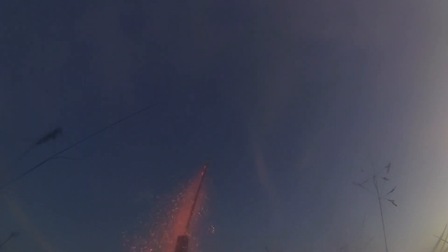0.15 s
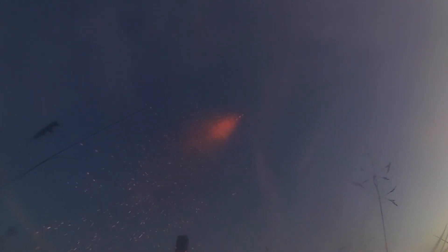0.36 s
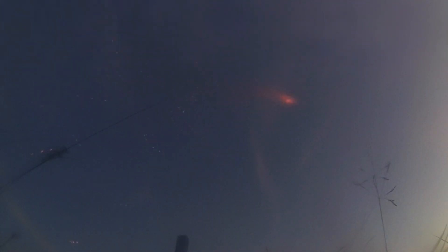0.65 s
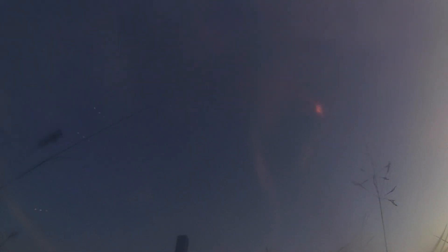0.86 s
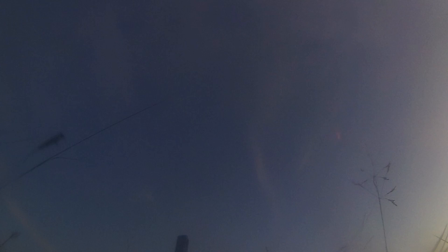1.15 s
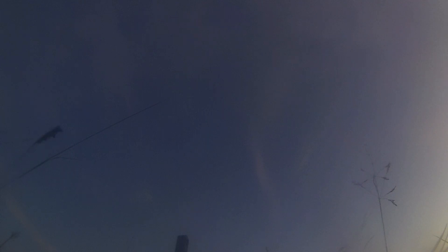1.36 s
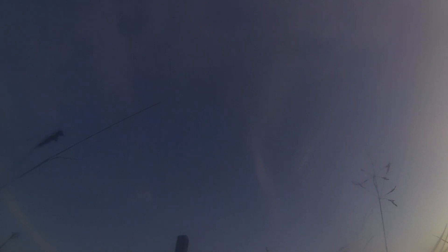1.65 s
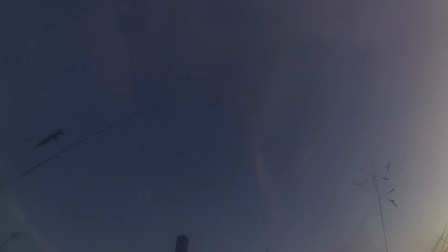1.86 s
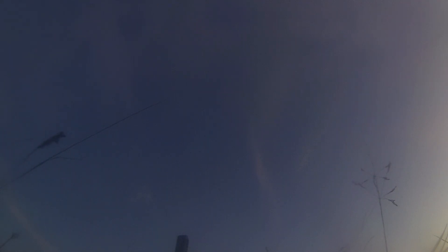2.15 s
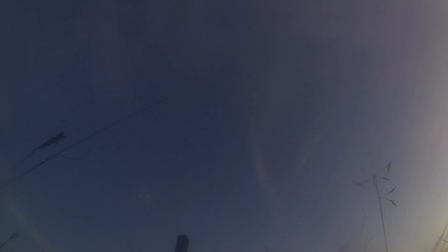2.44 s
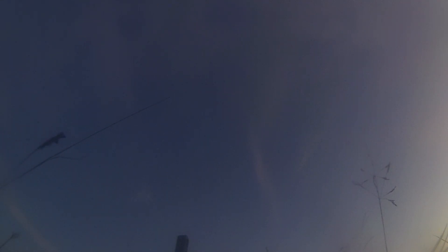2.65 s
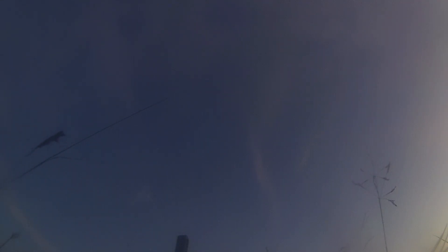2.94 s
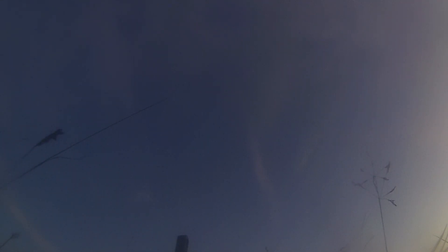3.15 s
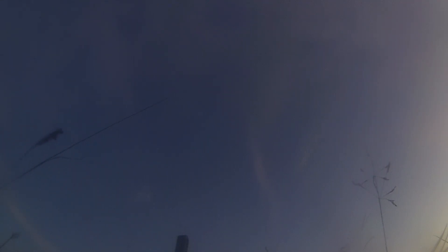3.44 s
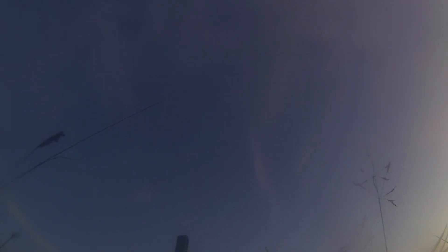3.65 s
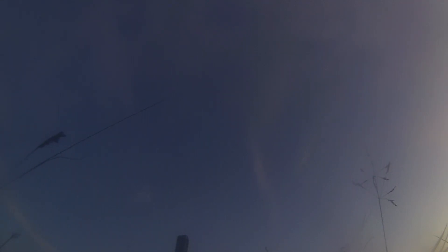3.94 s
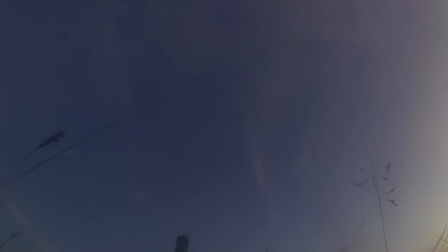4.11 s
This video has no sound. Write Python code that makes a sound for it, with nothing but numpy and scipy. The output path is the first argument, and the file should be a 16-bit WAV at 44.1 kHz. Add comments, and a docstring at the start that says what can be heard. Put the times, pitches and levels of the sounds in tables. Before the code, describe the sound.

A small firework rocket bursts off with a loud crackling hiss that thins away into the distance, followed by soft wind thumps.

```python
"""A rush of hiss bursts out and thins away as a small firework rocket arcs over open ground, with low thumps.
The jet is crackling noise; its ground echo adds a comb whose notches slide down in the climb, up in the sinking.
Lumpy low noise and single pulses are the launch blast up to about 0.75 s and light wind after it,
heard at a camera with two microphone ports. Hiss, two thin whine lines and short, faint low tones lie behind."""
import sys
import numpy as np
from scipy import signal
from scipy.io import wavfile
from scipy.ndimage import uniform_filter1d

SR = 44100
rng = np.random.default_rng(int(sys.argv[2]) if len(sys.argv) > 2 else 0)


def digitize_waveform(pressure):
    """Quantize a signal to 16-bit integers and store it at the path in sys.argv[1].

    Rows of a 2-D input are taken as channels; values are limited to [-1, 1].
    """
    field = np.atleast_2d(pressure).T
    bounded = np.clip(field, -1, 1)
    quanta = np.round(bounded * 32767).astype(np.int16)
    wavfile.write(sys.argv[1], SR, quanta)


N = 188643
SIZE, HOP = 1024, 128  # spectral frame and step, samples
HZ = np.fft.rfftfreq(SIZE, 1 / SR)
TIMES = np.arange(N // HOP + 9) * HOP / SR

# Jet: level of the hiss near 9 kHz. Each row: time in seconds, relative level in dB.
HISS = [(0.0, -30), (0.19, -23.5), (0.27, -23), (0.39, -21.5), (0.48, -24.5), (0.55, -21.5), (0.61, -17.5),
        (0.67, -22.5), (0.75, -24), (0.8, -27), (0.83, -32), (0.95, -31.5), (1.06, -34), (1.19, -43),
        (1.27, -38.5), (1.43, -34), (1.62, -40), (1.8, -42), (2.0, -43), (2.1, -47), (2.24, -47),
        (2.38, -42.5), (2.465, -51.5), (2.495, -55), (2.8, -55), (3.11, -58), (3.17, -50), (3.24, -60),
        (3.38, -56.5), (3.56, -61), (3.92, -62.5), (4.0, -57), (4.13, -65), (4.22, -53.5), (4.28, -58)]
# Lower bands of the jet. Each row: time in seconds, relative level near 1.5 kHz in dB, near 4 kHz in dB.
ROAR = [(0.0, -24, -32), (0.22, -18.5, -26.5), (0.3, -22, -26.5), (0.52, -27.5, -24.5),
        (0.62, -23.5, -25.5), (0.74, -30.5, -24.5), (0.8, -33, -31.5), (0.88, -34, -39), (0.95, -39, -39),
        (1.04, -44, -42.5), (1.25, -49, -43.5), (1.47, -46, -43), (1.6, -49.5, -42.5), (2.0, -54.5, -50),
        (2.3, -57, -52.5), (2.47, -55, -50), (2.495, -59, -55.5), (2.75, -57, -54), (3.1, -62.5, -61.5),
        (3.3, -59, -55.5), (3.47, -55, -51), (3.58, -57, -60.5), (3.7, -65.5, -58), (3.95, -56.5, -56),
        (4.04, -56.5, -54), (4.1, -62.5, -52), (4.18, -54, -49), (4.28, -59, -55)]
# Jet rumble under 700 Hz. Each row: time in seconds, relative level in dB.
RUMBLE = [(0.0, -42), (0.12, -38.5), (0.36, -32), (0.4, -32), (0.44, -39.5), (0.49, -32), (0.62, -36.5),
          (0.77, -41.5), (0.9, -41), (1.1, -47), (1.9, -56.5), (2.4, -59), (3.6, -65), (4.28, -78)]
# Plain colour of the jet at the ports. Each row: frequency in Hz, relative density in dB per Hz.
JET_COLOUR = [(90, -20), (200, -14), (330, -15.5), (450, -13.5), (650, -9), (850, -9.5), (1050, -5.5),
              (1250, -8), (1800, -9), (1960, -9), (2300, -13), (2700, -14.5), (3900, -10.5), (5200, -14.5),
              (8000, -5), (10300, -2), (12300, -14.5), (15900, -24.5)]
# How far each band control reaches. Each row: frequency in Hz, share of the control.
ROAR_REACH = [(700, 0.13), (950, 0.82), (1150, 1), (1950, 0.66), (2250, 0.41), (3000, 0.01)]
MIDDLE_REACH = [(1800, 0.29), (3000, 1), (4500, 0.66), (7000, 0.01)]
RUMBLE_REACH = [(100, 0.55), (700, 0.81), (1100, 0.025)]
# Each band over the hiss when the jet has its plain colour, dB
USUAL_ROAR_DB, USUAL_MIDDLE_DB, USUAL_RUMBLE_DB = -4, -8.5, -8.5
# Resonances of the camera's shell. Each row: frequency in Hz, width in Hz, boost in dB.
SHELL = [(1320, 125, 6.), (1730, 160, 6.)]
# The roar's lower edge and the top treble rise and fall. Each row: time in seconds,
# level of the lower edge in dB, level of the top treble in dB.
EDGES = [(0, -4, -1), (.1, -5.5, -1), (.3, -5.5, 0), (.55, -4, 1.5), (.7, -1, 1.5), (.85, 0.5, 1),
         (1.0, 2, 2), (1.3, 2, 0), (2.3, 1.5, -1), (3, -.5, 0), (3.45, -2, 0), (4.28, -1, -1)]
# Reach of each of the two. Each row: frequency in Hz, share of the level in dB.
LOWER_EDGE_REACH = [(790, 0), (920, 1), (1120, 1), (1250, 0)]
TOP_REACH = [(11000, 0), (12500, 1)]

# The powder flares up, or now and then dips. Each row: time in seconds,
# rise in dB before levelling off, length in ms.
FLARES = [(.134, 1.5, 24), (.194, 1.5, 36), (0.311, 1.5, 13), (0.347, 1, 36), (.382, 1, 8), (0.441, 4, 11),
          (.496, 2.5, 11), (.597, 2, 40), (0.751, 0.5, 6.9), (.826, -3.5, 13), (0.889, 8.5, 11),
          (1.018, 1, 6.4), (1.082, 5, 11), (1.137, 2.5, 6.8), (1.181, 5, 10), (1.363, 10, 11),
          (1.435, 5, 13), (1.586, 0, 11), (1.629, 9, 16), (1.765, 9, 12), (1.854, 5, 13), (1.892, 2.5, 38),
          (1.992, 9, 16), (2.025, 5.5, 6.1), (2.061, 7, 7.5), (2.165, 5, 19), (2.216, 8, 18), (2.27, 1, 15),
          (2.32, 0.5, 44), (2.425, 13, 17), (2.476, 8, 15), (3.466, 4, 18), (3.522, 1.5, 15),
          (3.635, 4, 7.8), (4.035, 2.5, 21)]
# Flares lift the jet below this; the hiss above follows by this share
FLARE_TOP_HZ, FLARE_HISS_SHARE = 5300, 0.16
FLARE_MOST_DB = 4.  # flares level off toward this rise
SPARKS_PER_S, SPARKS_DB, SPARK_SPREAD_DB = 700, -11, 3.2  # popping sparks; level against the steady noise

# Extra path by way of the ground, longest with the rocket highest. Each row: time in seconds, lag in ms.
GROUND_LAG = [(0.0, 0.32), (0.19, 0.45), (0.33, 0.55), (0.47, 0.77), (0.61, 1.09), (0.75, 1.44),
              (0.89, 1.76), (1.03, 2.02), (1.2, 2.27), (1.5, 2.57), (1.8, 2.5), (2.4, 2.27), (2.7, 2.1),
              (3.3, 1.74), (3.9, 1.36), (4.28, 1.12)]
# Soft ground returns less treble. Each row: frequency in Hz, reflection factor before further factors.
GROUND = [(300, .75), (700, .78), (1500, .8), (2300, .78), (3200, .68), (6000, .68), (7500, .3),
          (10000, .09)]
# Extra phase turn of the echo. Each row: frequency in Hz, delay in radians.
GROUND_TURN = [(300, 0.79), (800, 0.52), (1300, 0.22), (1750, 0.034), (2300, 0.48), (3000, 0.28),
               (4000, -0.16), (5000, -0.95)]
STEEP_LOSS_DB = 1.9  # weaker reflection per ms of lag, as the sound strikes the ground more steeply
# Echo strength over time, weak near launch, swelling and fading later. Each row: time in seconds,
# echo factor in the middle band, echo factor in the high band.
ECHO_STRENGTH = [(0.3, .3, .3), (.45, .5, .75), (.65, .5, .8), (.85, .45, .6), (1.0, .55, .45),
                 (2.0, .6, .55), (2.7, .8, .75), (3.1, .55, .45), (3.47, 1.1, .9), (3.72, .55, .5),
                 (3.95, 1.1, .85), (4.2, 1.3, .7)]
ECHO_MIDDLE_HZ, ECHO_HIGH_HZ = 900, 2400  # where the middle and high bands begin

# The rocket swings off the camera's axis. Each row: time in seconds, bearing factor, left over right in dB.
BEARING = [(0, 0.21, 0.3), (.95, 0.69, -1), (1.4, 0.85, -1.2), (2.0, 1, -0.5), (2.8, 0.99, -1),
           (3.5, 0.58, -2.2), (4.28, 1.27, -4)]
# Phase between the ports at bearing 1. Each row: frequency in Hz, left lead in radians.
PORT_PHASE = [(200, -0.4), (500, 1.1), (1000, 0), (1400, -0.23), (2000, 0.7), (4000, 0.8), (6000, 0.1),
              (8000, 2.27), (10000, 2), (12500, 0.8), (15000, 2.7)]
# Likeness of the ports at bearing 1. Each row: frequency in Hz, likeness from 0 to 1.
PORT_SAME = [(200, 0.9), (700, 0.88), (1150, 0.97), (1800, 0.975), (2500, 0.7), (4000, 0.85), (6000, 0.8),
             (8000, 0.65), (10000, 0.7), (13000, 0.62)]
# Port balance by pitch. Each row: frequency in Hz, left over right in dB.
PORT_BALANCE = [(200, 0.5), (700, -1.5), (1500, -0.8), (2500, -1), (4000, -1), (8300, -4.5), (9800, 7.5),
                (12000, 4.5), (15000, -2.5)]

# Low rumble of the launch blast up to about 0.75 s, of wind after it.
# Each row: time in seconds, relative level in dB.
LOW_RUMBLE = [(0.0, -53), (0.2, -72), (0.33, -64), (0.52, -47), (0.64, -61), (0.72, -58), (0.77, -62),
              (0.98, -46), (1.14, -52), (1.2, -54), (1.4, -51.5), (1.65, -58), (1.9, -52), (2.02, -57),
              (2.9, -54), (3.25, -55), (3.55, -59.5), (3.75, -55), (3.9, -46.5), (4.28, -52)]
# Colour of that low rumble. Each row: frequency in Hz, relative density in dB per Hz.
LOW_RUMBLE_COLOUR = [(7.1, -18), (12, -2), (32, -11.5), (68, -10.5), (184, -30), (236, -25.5), (281, -30.5),
                     (400, -29.5), (520, -37), (880, -120)]
# Single thumps, of the launch blast up to about 0.75 s, of wind after it. Each row: time in seconds,
# nominal peak in dB, pitch in Hz, left port ahead in ms, push 1 or pull -1.
THUMPS = [(0.209, -53, 190, .1, 1), (0.306, -32, 100, 0.0089, 1), (0.361, -32, 132, -0.19, -1),
          (0.376, -46, 135, 0.22, 1), (0.389, -39, 60, .1, -1), (0.556, -32, 97, .1, -1),
          (0.611, -44, 60.4, .1, -1), (0.628, -34, 146, -0.048, 1), (0.647, -27, 163, 0.022, -1),
          (0.69, -32.5, 140, -0.039, 1), (1.066, -21.5, 101, 0.91, 1), (1.095, -33, 58, 0.6, -1),
          (1.124, -39, 70, 0.65, -1), (1.344, -31, 120, -0.93, 1), (1.422, -40.5, 110, -0.89, -1),
          (1.482, -32, 62.6, -0.7, -1), (1.511, -29, 106, -0.67, -1), (1.542, -30, 154, -0.79, -1),
          (1.561, -28.5, 67, -1.2, 1), (1.77, -35, 51.4, 0.39, -1), (1.869, -37, 75, 0.95, -1),
          (2.214, -35, 67, 0.49, -1), (2.254, -34, 38.7, 0.3, 1), (2.267, -30, 67, 0.93, -1),
          (2.605, -33.5, 56, 0.4, -1), (2.62, -34, 57, 0.55, -1), (2.643, -36.5, 58.7, 0.79, -1),
          (2.787, -41, 50, .3, -1), (3.809, -43.5, 45, .3, -1), (3.954, -32, 54.7, 0.57, -1),
          (4.011, -36, 46.3, 0.1, 1), (4.115, -35.5, 54.7, -0.54, -1), (4.166, -35, 75, -0.61, -1),
          (4.197, -35, 60, -0.3, -1), (4.234, -36, 45, 0.18, -1), (4.252, -36, 49.7, 0.23, 1)]
SWELL_S, SWELL_DB = 0.022, -21  # low rumble swells at each thump: half-width, control level against the peak
FLUTTER_SLOPE, FLUTTER_AT_DB = 0.81, -62  # dB of flutter held back per dB of low rumble, and the pivot level
LAUNCH_S, LAUNCH_FLUTTER_DB = 0.83, 3  # stronger flutter control up to this time
SHARP_HZ, SHARP_DB_PER_OCTAVE = 67.6, 4.5  # quicker thumps raise the flutter control

# Port hiss. Each row: frequency in Hz, relative density in dB per Hz.
AIR = [(100, -11), (300, -10), (800, -4), (2000, -10), (6000, -9.5), (12000, -9), (16000, -25)]
AIR_DB = -58  # rms, before the band limit
# Electrical whine. Each row: frequency in Hz, level in dB rms.
WHINE = [(13028, -84), (13108, -80)]
# Faint low tones far off. Each row: time of the middle in seconds, peak level in dB, pitch in Hz, length in seconds.
HOOTS = [(2.11, -55.5, 245.5, 0.083), (2.328, -53, 256, 0.034), (3.036, -54, 235, 0.12)]
HOOT_AHEAD = 0.87  # radians by which the far tones lead at the left port
EDGE_HZ = 15800


def gain_of(db):
    """Decibels to a factor."""
    return 10 ** (np.asarray(db) / 20)


def evened(x):
    """Scales to rms 1."""
    return x / np.sqrt(np.mean(x ** 2) + 1e-20)


def read(points):
    """A spectrum table on the frequency bins, as a column."""
    f, value = np.transpose(points)
    return np.interp(np.log(HZ + 1), np.log(f + 1), value)[:, None]


def follow(rows):
    """The columns of a curve table at the frame times."""
    s, *columns = np.transpose(rows)
    return [np.interp(TIMES, s, c) for c in columns]


def frames_of(x):
    """Short-time spectra."""
    return signal.stft(x, nperseg=SIZE, noverlap=SIZE - HOP)[2][..., :len(TIMES)]


def sound_of(z):
    """Back from short-time spectra."""
    return signal.istft(z, nperseg=SIZE, noverlap=SIZE - HOP)[1][..., :N]


def white(channels):
    """Spectra of white noise."""
    return frames_of(rng.standard_normal((channels, len(TIMES) * HOP)))


def wander(size):
    """Smooth chance at the sample rate, rms 1, its slowest drift taken out."""
    rough = rng.standard_normal(len(TIMES) * HOP)
    smooth = uniform_filter1d(uniform_filter1d(rough, size), size)
    return evened(smooth - uniform_filter1d(smooth, 4 * size))


def below(x, hz):
    """The part of a two-channel sound under a frequency, without delay."""
    return signal.oaconvolve(x, signal.firwin(255, hz, fs=SR)[None], "same")


def jet():
    """Burning noise takes its colour over time, meets its ground echo and spreads over the two ports."""
    level_db, treble = jet_colour()
    a, b = frames_of(sputter())
    bearing, pan_db = follow(BEARING)
    same = np.clip(1 - (1 - read(PORT_SAME)) * bearing, 0, 1)  # less alike off the axis
    right = same * a + np.sqrt(1 - same ** 2) * b
    right = right * np.exp(-1j * read(PORT_PHASE) * bearing)
    tilt = gain_of((read(PORT_BALANCE) + pan_db) / 2)
    ports = np.array([a * tilt, right / tilt])
    return sound_of(ports * ground_comb() * gain_of(level_db + 1.5) / treble)


def jet_colour(patchy_db=1.5):
    """The jet's moving spectrum in dB, with the treble strength of its plain colour for scaling."""
    hiss_db = follow(HISS)[0]
    roar_db, middle_db = follow(ROAR)
    rumble_db = follow(RUMBLE)[0]
    lower_edge_db, top_db = follow(EDGES)
    plain_db = read(JET_COLOUR)
    for hz, width, db in SHELL:
        plain_db = plain_db + db * np.exp(-((HZ[:, None] - hz) / width) ** 2)
    in_treble = (HZ > 6000) & (HZ < 12000)
    treble = np.sqrt(np.mean(gain_of(plain_db[in_treble]) ** 2) * 6000 / (SR / 2))
    # each lower band departs from the hiss only by its difference from the plain colour
    level_db = plain_db + hiss_db
    level_db = level_db + read(ROAR_REACH) * (roar_db - hiss_db - USUAL_ROAR_DB)
    level_db = level_db + read(MIDDLE_REACH) * (middle_db - hiss_db - USUAL_MIDDLE_DB)
    level_db = level_db + read(RUMBLE_REACH) * (rumble_db - hiss_db - USUAL_RUMBLE_DB)
    level_db = level_db + read(LOWER_EDGE_REACH) * lower_edge_db + read(TOP_REACH) * top_db
    # eddies in the air make bands swell and fade
    patches = rng.standard_normal((len(TIMES), len(HZ))).T
    patches = uniform_filter1d(uniform_filter1d(patches, size=12, axis=0), size=14, axis=1)
    return level_db + patchy_db * evened(patches), treble


def sputter(quick_db=0.53, hiss_db=0.7, roar_db=1.4, split_hz=2500):
    """Turbulent noise of burning powder: crackle, sparks and flares; roar and hiss surge each on their own."""
    crackle_db = quick_db * wander(size=60)
    t = np.arange(len(crackle_db)) / SR
    pop_sizes = gain_of(SPARK_SPREAD_DB * np.minimum(rng.exponential(1, len(t)), 4))
    pops = pop_sizes * (rng.random(len(t)) < SPARKS_PER_S / SR)
    puffs = signal.oaconvolve(pops, np.exp(-t[:200] / .0006))[:len(t)]  # 0.6 ms decay
    spark_power = (gain_of(SPARKS_DB) * evened(puffs)) ** 2
    noise = rng.standard_normal((2, len(t))) * np.sqrt(1 + spark_power)
    low = below(noise, split_hz)
    roar = low * gain_of(roar_db * wander(size=600))
    hiss = (noise - low) * gain_of(hiss_db * wander(size=500))
    plain = evened(gain_of(crackle_db) * (roar + hiss))
    flare_db = sum(db * np.exp(-(2000 * (t - s) / ms) ** 2) for s, db, ms in FLARES)
    flare_db = FLARE_MOST_DB * np.tanh(flare_db / FLARE_MOST_DB)
    body = below(plain, FLARE_TOP_HZ)
    return body * gain_of(flare_db) + (plain - body) * gain_of(FLARE_HISS_SHARE * flare_db)


def ground_comb():
    """Direct sound plus its late, duller ground echo: the two cancel at notches set by the lag."""
    lag_ms = follow(GROUND_LAG)[0]
    middle, high = follow(ECHO_STRENGTH)
    column = HZ[:, None]
    echo = read(GROUND) / gain_of(STEEP_LOSS_DB * lag_ms)
    echo = echo * np.select([column > ECHO_HIGH_HZ, column > ECHO_MIDDLE_HZ], [high, middle], 1)
    late = 2 * np.pi * column * lag_ms / 1000 + read(GROUND_TURN)  # radians
    return (1 + echo * np.exp(-1j * late)) / np.sqrt(1 + echo ** 2)


def thumps(turns=0.33, point=1.13, sag=0.13, sag_turns=1.32):
    """Blast, then wind: each sharply pushes or pulls the membranes in a slower counter-swing, port by port."""
    t, out = np.arange(N) / SR, np.zeros((2, N))
    skews = rng.uniform(-0.12, 0.52, len(THUMPS))  # radians
    for (s, db, hz, ahead_ms, way), skew in zip(THUMPS, skews):
        near = slice(max(round((s - .08) * SR), 0), round((s + .08) * SR))
        port_lead = np.array([[1], [-1]]) * ahead_ms / 2000
        u = (t[near] - s + port_lead) * hz  # cycles from the peak
        push = (1 + sag) * np.exp(-abs(u / turns) ** point) * np.cos(2 * np.pi * u + skew)
        push = push - sag * np.exp(-(u / sag_turns) ** 2)
        out[:, near] += np.sign(way) * gain_of(db) * push
    return out


def low_rumble(same=0.95):
    """Low lumpy pressure of the blast, then wind, nearly alike at both ports, swelling at each thump."""
    swells, sharp_db = 0, 0
    for s, db, hz, *_ in THUMPS:
        swell = np.exp(-((TIMES - s) / SWELL_S) ** 2)
        swells = swells + gain_of(db + SWELL_DB) * swell
        sharp_db = sharp_db + SHARP_DB_PER_OCTAVE * np.log2(hz / SHARP_HZ) * swell
    level_db = 20 * np.log10(gain_of(follow(LOW_RUMBLE)[0]) + swells)
    # the flutter, from about 140 Hz up, grows more slowly than the rumble
    flutter_db = FLUTTER_SLOPE * (FLUTTER_AT_DB - level_db) + LAUNCH_FLUTTER_DB * (TIMES < LAUNCH_S)
    flutter_db = flutter_db + sharp_db
    colour_db = read(LOW_RUMBLE_COLOUR) + read([(90, 0.1), (140, 0.97)]) * (flutter_db + 9.0)
    a, b = white(channels=2)
    ports = np.array([a, same * a + np.sqrt(1 - same ** 2) * b])
    steady = sound_of(ports * gain_of(colour_db))
    lumps_db = 1.1 * wander(size=1500)[:N]
    sample_db = np.interp(np.arange(N) / HOP, np.arange(len(TIMES)), level_db)
    return steady * gain_of(sample_db + 36.0 + lumps_db)


def background():
    """Unrelated hiss at each port, two thin electrical lines and the far tones."""
    t = np.arange(N) / SR
    hiss = gain_of(AIR_DB) * evened(sound_of(white(channels=2) * gain_of(read(AIR))))
    whine = sum(gain_of(db) * np.sqrt(2) * np.sin(2 * np.pi * hz * t) for hz, db in WHINE)
    hoots = np.zeros((2, N))
    for s, db, hz, length in HOOTS:
        tone = np.sin(2 * np.pi * hz * t + np.array([[HOOT_AHEAD], [0]]))
        hoots += gain_of(db) * np.exp(-(2 * (t - s) / length) ** 2) * tone
    return hiss + whine + hoots


def scene():
    """Rocket, low rumble, thumps and background."""
    return jet() + low_rumble() + thumps() + background()


def record(dry):
    """The recorder's band limit: a steep low-pass without delay."""
    low_pass = signal.firwin(1023, EDGE_HZ, window=("kaiser", 9), fs=SR)
    return signal.oaconvolve(dry, low_pass[None], "same")


dry = scene()
out = record(dry)
digitize_waveform(out)
```